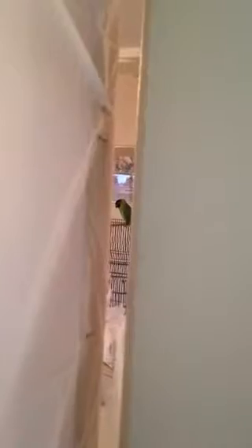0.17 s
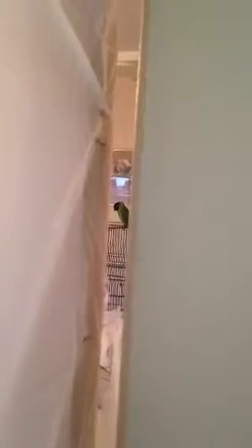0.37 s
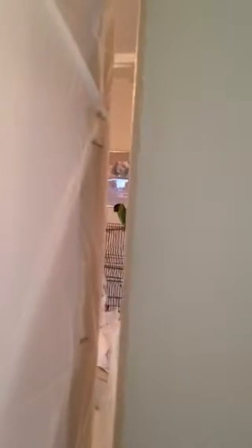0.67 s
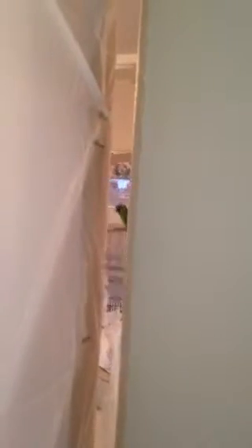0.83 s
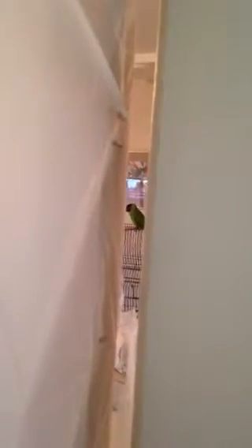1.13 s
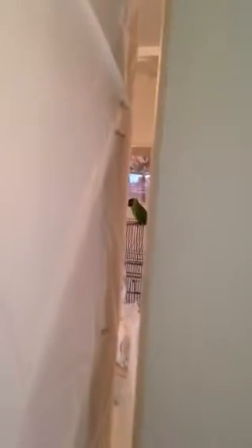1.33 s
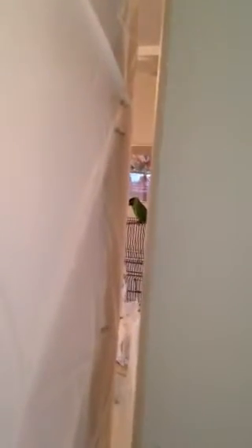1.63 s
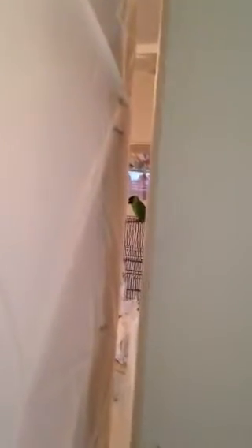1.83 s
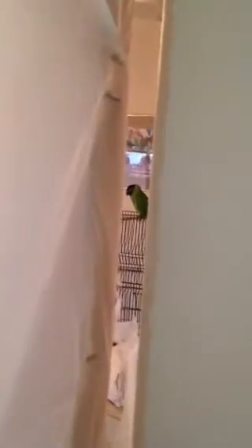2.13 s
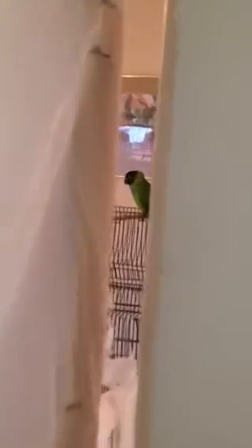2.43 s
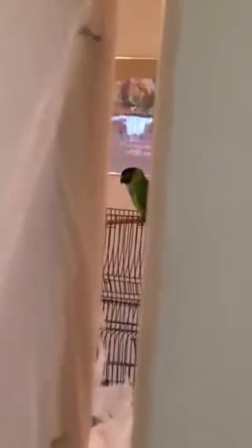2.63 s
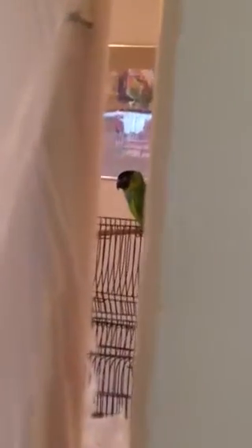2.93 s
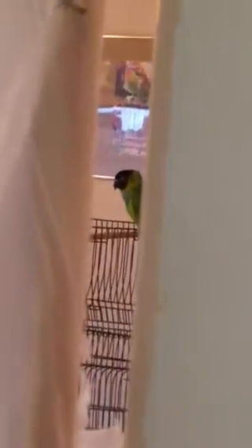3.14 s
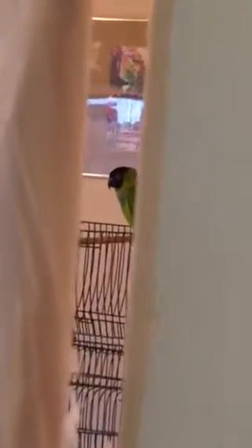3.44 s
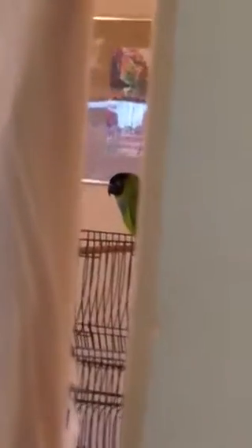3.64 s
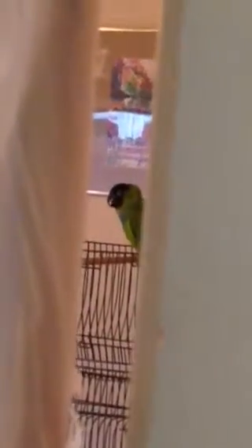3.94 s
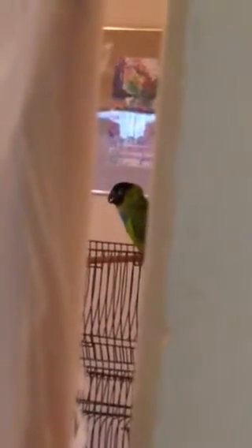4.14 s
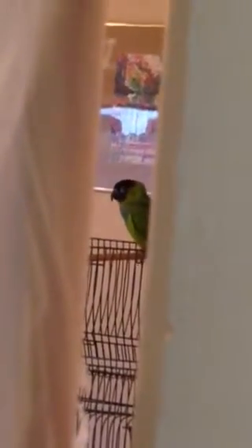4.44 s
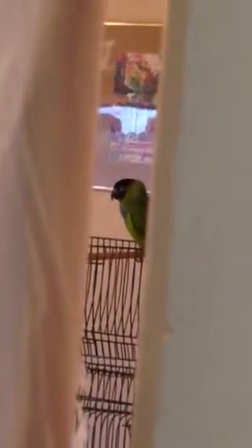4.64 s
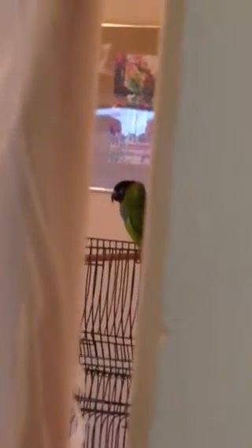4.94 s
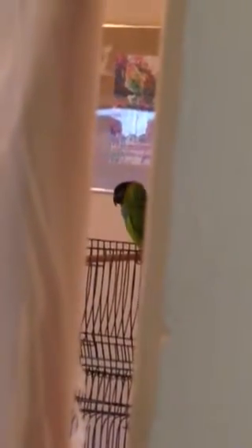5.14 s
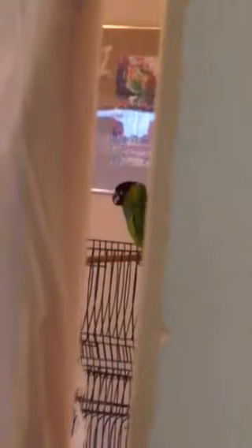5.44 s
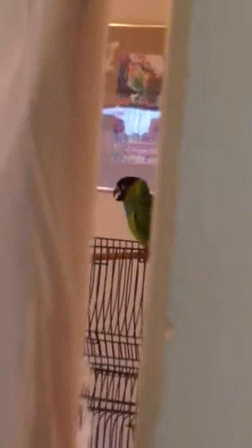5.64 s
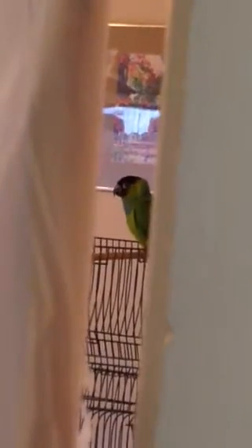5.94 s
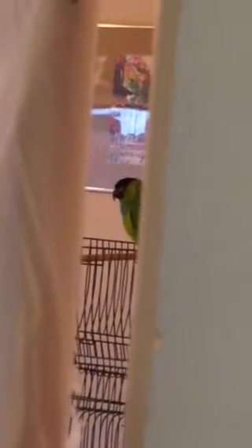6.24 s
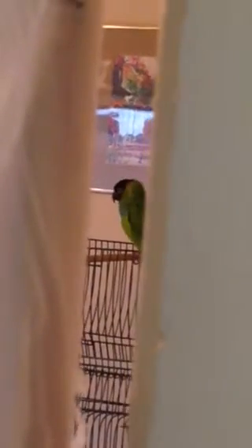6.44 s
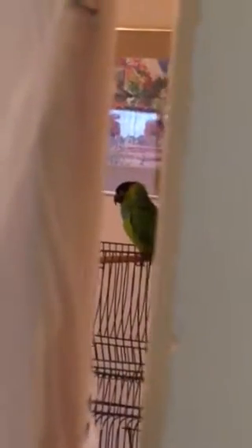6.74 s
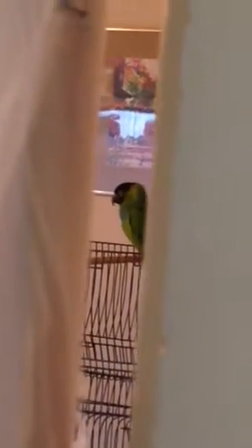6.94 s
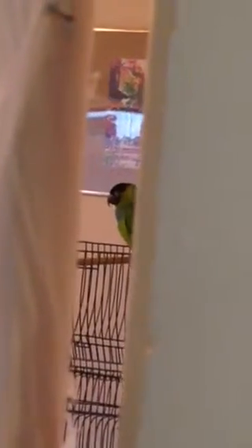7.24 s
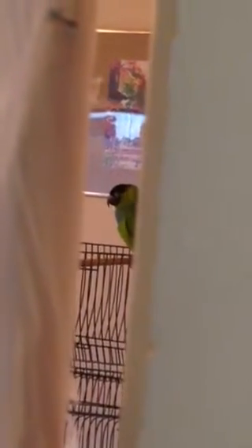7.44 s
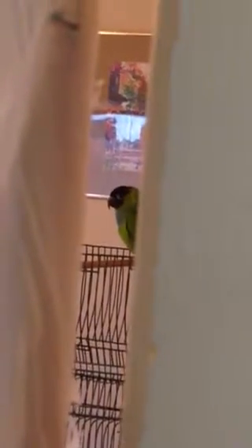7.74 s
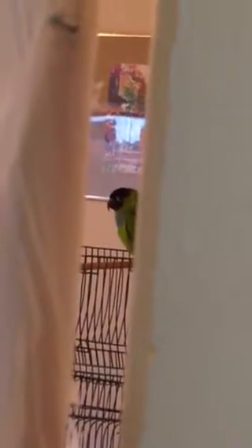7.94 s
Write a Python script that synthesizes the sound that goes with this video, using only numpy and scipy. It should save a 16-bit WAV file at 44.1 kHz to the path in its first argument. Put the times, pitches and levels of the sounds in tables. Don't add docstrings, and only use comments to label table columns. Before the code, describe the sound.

Over quiet hum and rumble, a caged conure gives soft clucks, clear whistles, a rasping screech, four rapid loud squawks, and faint claw taps.

```python
import sys
import numpy as np
from scipy import signal
from scipy.fft import rfft, irfft
from scipy.io import wavfile
from scipy.ndimage import uniform_filter1d, minimum_filter1d

SR = 44100
rng = np.random.default_rng(int(sys.argv[2]) if len(sys.argv) > 2 else 0)


def convert_level_to_amplitude(level_db):
    exponent = np.asarray(level_db, float) / 20
    return 10 ** exponent


def inscribe(sig):
    pcm = np.round(np.clip(np.atleast_2d(sig).T, -1, 1) * 32767)
    wavfile.write(sys.argv[1], SR, pcm.astype(np.int16))


N = 356857


def shape(points, hz):
    f, v = np.transpose(points)
    return np.interp(np.log(np.maximum(hz, 1)), np.log(f), v)


def noise(colour, size=N):
    gain = convert_level_to_amplitude(shape(colour, np.fft.rfftfreq(size, 1 / SR)))
    x = irfft(rfft(rng.standard_normal(size)) * gain, size)
    return x / x.std()


def walk(rate, size):
    k = max(int(SR / rate), 1)
    steps = np.repeat(rng.standard_normal(size // k + 1), k)
    return 1.6 * uniform_filter1d(uniform_filter1d(steps, k), k)[:size]


def strokes(rows):
    t = np.arange(N) / SR
    gain = 0
    for s, db, length in rows:
        distance = np.maximum((t - s) / length, (s - t) / (0.75 * length))
        gain = gain + convert_level_to_amplitude(db - 18 * distance)
    return gain


def play(tables, sing, edge_s=0.00077):
    out = np.zeros(N)
    for rows in tables:
        s, *columns = np.transpose(rows)
        n = np.arange(int(s[0] * SR), min(int(s[-1] * SR), N))
        t = n / SR
        ends = np.clip(np.minimum(t - s[0], s[-1] - t) / edge_s, 0, 1)
        out[n] += ends * sing(*(np.interp(t, s, c) for c in columns))
    return out


def stack(hz, gains_db):
    k = np.arange(1, len(gains_db) + 1)[:, None]
    phase = 2 * np.pi * np.cumsum(hz) / SR
    audible = k * hz < .4 * SR
    return np.sqrt(2) * np.sum(convert_level_to_amplitude(gains_db) * audible * np.sin(k * (phase + k)), axis=0)


def syrinx(hz, level_db, throat, weak_db, flicker_db, breath_db, count=24):
    k = np.arange(1, count + 1)[:, None]
    flicker = np.array([walk(90, len(hz)) for _ in k])
    gains_db = shape(throat, k * hz) + weak_db * (k % 2) + flicker_db * flicker
    gains_db = gains_db - 10 * np.log10(np.mean(np.sum(convert_level_to_amplitude(2 * gains_db), axis=0)))
    breath = convert_level_to_amplitude(breath_db) * noise(throat, len(hz))
    return convert_level_to_amplitude(level_db) * (stack(hz, gains_db) + breath)


# frequency in Hz, level in dB.
SQUAWK_THROAT = [(600, -50.5), (1000, -26), (2050, -14), (3050, -9.5), (3500, -3.5), (4150, -1.5),
                 (5100, -15), (6110, -9), (7200, -12.5), (8500, -18.5), (10500, -16), (12000, -28),
                 (14200, -25), (15500, -45)]


def squawk(level_db):
    share = np.linspace(0, 1, len(level_db))

    def bumps(lag, width=.06):
        return sum(np.exp(-((share - at - lag) / width) ** 4) for at in (.42, .63))

    fresh = np.exp(-share / .1)
    fall = np.clip((share - .76) / (1 - .76), 0, 1) ** 2
    hz = 980 + 25.5 * (1 - fresh) + 42 * bumps(0) - 133 * fall
    weak_db = -0.5 - 19 * (bumps(.05) + fresh + .7 * fall)
    catch_db = 6.5 * bumps(0) - 6 * bumps(1.4 * .06, .023)
    pitch = hz * (1 + (.005 + .015 * fall) * walk(400, len(hz)))
    return syrinx(pitch, level_db + catch_db - 2, SQUAWK_THROAT, weak_db, 2.5, -18, count=15)


# frequency in Hz, level in dB.
RUNUP_THROAT = [(290, -74), (500, -27.5), (1220, -19), (2200, -34.5), (2930, 2.5), (3330, -5), (3680, -5.5),
                (7130, -19.5), (8120, -20.5), (9650, -20.5), (15500, -52.5)]


def runup(hz, level_db):
    rough = syrinx(hz * (1 + .12 * walk(900, len(hz))), level_db, RUNUP_THROAT, 0, 4, 0)
    return rough + stack(hz, [level_db - 12])


# run-up start in s, membranes lock in s, call end in s, run-up level in dB, call level in dB.
SQUAWKS = [
    (5.098, 5.128, 5.228, -14.5, -7),
    (5.313, 5.338, 5.439, -16, -7.5),
    (5.532, 5.558, 5.66, -16.5, -7.5),
    (5.765, 5.793, 5.893, -17.5, -6.5),
]
# loudest in s, level in dB, length in s.
GASP = [
    (5.887, -14.5, .015),
]


def squawks():
    from_hz, to_hz, swell_s, release_s = 620, 1868, .008, 0.0085
    ups, calls = [], []
    for s, lock, end, up_db, call_db in SQUAWKS:
        swelled_hz = from_hz + (to_hz - from_hz) * swell_s / (lock - s)
        ups.append([(s, from_hz, up_db - 18), (s + swell_s, swelled_hz, up_db),
                    (lock + .001, to_hz, up_db - 5.5)])
        calls.append([(lock, call_db), (end - release_s, call_db), (end, call_db - 13)])
    return play(ups, runup) + play(calls, squawk) + noise(SQUAWK_THROAT) * strokes(GASP)


# frequency in Hz, level in dB.
SCREECH_THROAT = [(600, -68.5), (1100, -29.5), (1500, -17.5), (2250, -6.5), (3300, -9.5), (4400, -1.5),
                  (5500, -14), (6300, -10.5), (8000, -20), (10500, -34), (13000, -41), (15500, -43.5)]


def rasping_voice(hz, level_db):
    shake_hz = 135 * np.exp(.35 * walk(150, len(hz)))
    shake = np.sin(2 * np.pi * np.cumsum(shake_hz) / SR)
    pitch = hz * (1 + .04 * np.tanh(3 * shake) + .013 * walk(300, len(hz)))
    shaken = convert_level_to_amplitude(3.5 * shake + 1.5 * walk(200, len(hz)))
    return shaken * syrinx(pitch, level_db, SCREECH_THROAT, 0, 3, -18, count=14)


# time in s, pulse rate in Hz, level in dB.
SCREECH = [
    [(4.024, 520, -56.5), (4.034, 793, -26.5), (4.045, 1037, -23), (4.062, 1060, -13.5), (4.11, 1103, -14),
     (4.15, 1105, -15), (4.183, 1095, -14), (4.192, 1018, -10), (4.205, 900, -28)],
]


def screech():
    return play(SCREECH, rasping_voice)


def whistle(hz, level_db, beak_db, edge_db):
    third_db = level_db - 12 + edge_db + 0.52 * beak_db + 3 * walk(56, len(hz))
    upper = [third_db + step_db for step_db in (-11, -14, -11)]
    pitch = hz * (1 + 0.0034 * walk(200, len(hz)))
    return stack(pitch, np.array([level_db, level_db + beak_db, third_db] + upper))


# time in s, pitch in Hz, level in dB, beak opening as lift of the second partial in dB.
WHISTLES = [
    [(1.647, 2505, -34, 15), (1.673, 2515, -31, 7.5), (1.693, 2470, -24.5, -3.5), (1.725, 2365, -20.5, -12),
     (1.742, 2313, -34, -12), (1.752, 2227, -30, -29.5), (1.76, 2270, -36.5, -25.5)],
    [(4.914, 2580, -17.5, -6.5), (4.93, 2680, -18, -4), (4.966, 2495, -21.5, -10),
     (5.008, 2455, -27.5, -8.5), (5.018, 2300, -24.5, -13), (5.028, 1946, -26.5, -19.5)],
    [(6.124, 2380, -40.5, 6), (6.145, 2480, -28.5, -6), (6.165, 2480, -25, -11.5), (6.193, 2475, -31.5, 0),
     (6.215, 2440, -30, -15)],
]
WHISTLE_EDGE_DB = (-4.5, 4, 3.5)
# loudest in s, level in dB, length in s.
RASP = [
    (4.972, -35, 0.038),
]


def whistles():
    rows = [[tuple(row) + (edge_db,) for row in table] for table, edge_db in zip(WHISTLES, WHISTLE_EDGE_DB)]
    hiss = noise([(2500, -30), (3800, 1.5), (8000, -5), (11000, -10.5), (15000, -25)]) * strokes(RASP)
    return play(rows, whistle, edge_s=1 / 200) + hiss


# frequency in Hz, level in dB.
CLUCK_THROAT = [(300, -42.5), (600, -7.5), (900, -3), (1500, -10.5), (2600, -19.5), (4500, -26.5),
                (6000, -29), (8000, -48.5), (12000, -80)]


def croak(hz, level_db, odd_db, rough):
    pitch = hz * (1 + .08 * rough ** 2 * walk(600, len(hz)))
    return syrinx(pitch, level_db, CLUCK_THROAT, odd_db, 3, 14 * rough - 17, count=10)


# start in s, length in s, starting pitch in Hz, level in dB, roughness 0-1.
CLUCKS = [
    (1.424, 0.02, 629, -31.5, 0.89),
    (1.614, 0.036, 684, -33.5, 0.87),
    (4.021, 0.024, 1024, -41, 0),
    (4.872, 0.039, 563.4, -23.5, 0.36),
]


def clucks():
    rows = []
    for s, length, hz, db, rough in CLUCKS:
        peak = .8 - .6 * rough
        rows.append([(s + share * length,
                      hz * 2 ** (30 * share * length),
                      db - 650 * length * abs(share - peak),
                      rough) for share in (0, peak, 1)])

    def sing(hz, db, rough):
        odd_db = 12 * (1 - rough) * np.log2(hz / 900) - 8 * rough
        return croak(hz, db, odd_db, rough)

    return play(rows, sing, edge_s=1 / 250)


# time in s, pitch in Hz, level in dB, odd partials in dB, roughness 0-1.
SIGH = [
    [(4.185, 1550, -50, 0, 0.5), (4.2, 1448, -44.5, 4.5, 0.45), (4.23, 1184, -49, -6, 0.6)],
]


def sigh():
    return play(SIGH, croak, edge_s=1 / 250)


def taps(rows):
    out, t = np.zeros(N + SR), np.arange(SR // 5) / SR
    for s, peak_db, hz, octaves, t60 in rows:
        skirt, half = 4 ** octaves, 2 ** (octaves / 2)
        burst = noise([(hz / skirt, -40), (hz / half, 0), (hz * half, 0), (hz * skirt, -40)], len(t))
        decay = convert_level_to_amplitude(-60 * t / max(t60, .004))
        attack = np.minimum(t * hz * 2, 1)
        start = int(s * SR)
        out[start:start + len(t)] += convert_level_to_amplitude(peak_db - 1.0) * burst * decay * attack
    return out[:N]


# time in s, peak in dB, centre in Hz, width in octaves, t60 in s.
TAPS = [(1.862, -34.5, 460, 1.8, 0.081), (1.875, -38.5, 197, 1.5, 0.13), (2.083, -47, 2400, 2.4, 0.047),
        (2.64, -57.5, 1500, 1.6, 0.044), (3.66, -58, 690, .8, 0.142), (7.146, -47.5, 1090, 1.9, 0.1),
        (7.317, -55, 1600, 1.5, .02), (7.413, -44.5, 2600, 1.8, 0.016), (7.433, -38.5, 890, 2.65, 0.048),
        (7.74, -60.5, 900, 1.8, 0.12)]


def far_taps():
    return taps(TAPS)


# time in s, peak in dB, centre in Hz, width in octaves, t60 in s.
NEAR_TAPS = [
    (1.066, -29, 225, 1.5, 0.016),
    (2.478, -49.5, 307, 0.32, 0.041),
    (2.548, -50, 334, 2.5, 0.0157),
]


def near_taps():
    return taps(NEAR_TAPS)


# frequency in Hz, t60 in s.
ROOM_T60 = [(300, 0.39), (1000, 0.4), (3000, 0.52), (6000, 0.47), (12000, 0.22)]


def room(x):
    gap_s, level_db = 0.0056, -11
    t = np.arange(SR) / SR
    tail = 0
    for hz in 125 * 2. ** np.arange(8):
        band = noise([(hz / 2, -40), (hz / 1.3, 0), (hz * 1.3, 0), (hz * 2, -40)], SR)
        tail = tail + np.sqrt(hz) * band * convert_level_to_amplitude(-60 * t / shape(ROOM_T60, hz))
    tail = tail * np.clip(t / gap_s - 1, 0, 1)
    return signal.fftconvolve(x, tail * convert_level_to_amplitude(level_db) / np.sqrt(np.sum(tail ** 2)))[:N]


# frequency in Hz, level in dB.
SIDEWAYS = [(2600, -0.5), (3500, -0.5), (4100, -5), (4800, 1.5), (6000, 2.5), (9000, -3)]


def toward_walls(x):
    return irfft(rfft(x) * convert_level_to_amplitude(shape(SIDEWAYS, np.fft.rfftfreq(N, 1 / SR))), N)


# loudest in s, level in dB, length in s.
CLOTH = [(0.01, -67.5, 0.038), (.19, -44, 0.13), (.56, -65.5, 0.33), (1.02, -67.5, 0.13),
         (1.29, -73, 0.087), (2.06, -61, 0.094), (2.2, -63, 0.068), (2.303, -63.5, 0.023),
         (2.44, -69, 0.19), (2.515, -70, 0.0225), (2.68, -67.5, 0.212), (2.87, -73.5, 0.064),
         (3.07, -71, 0.102), (3.31, -74.5, 0.11), (3.64, -80, 0.095), (3.87, -71, 0.059), (7.5, -75.5, .1),
         (7.74, -74, .15)]
# frequency in Hz, level in dB per Hz.
CLOTH_COLOUR = [(470, -38), (800, -16.5), (1330, -21), (2320, -2), (2940, -7), (3330, -1.5), (5200, 0),
                (11700, -7.5), (15500, -21.5)]


def cloth():
    grain = convert_level_to_amplitude(0.96 * walk(220, N))
    return grain * noise(CLOTH_COLOUR) * strokes(CLOTH)


# loudest in s, level in dB, length in s.
SHUFFLE = [(.015, -74, 0.027), (.13, -62.5, 0.27), (.5, -73.5, 0.136), (1.04, -64, 0.18), (1.22, -67, 0.19),
           (1.93, -60, .2), (2.45, -65.5, 0.24), (2.71, -56, 0.077), (3.31, -71.5, 0.24),
           (3.64, -64, 0.139), (4.55, -69, .2), (6.87, -71.5, .05), (7.04, -75, 0.092),
           (7.56, -75.5, 0.075), (7.76, -65, 0.32)]


def shuffling():
    colour = [(120, -7.0), (350, -2.0), (900, -6), (2000, -14.5), (5000, -33)]
    return convert_level_to_amplitude(3.8 * walk(40, N) + 1.0) * noise(colour) * strokes(SHUFFLE)


# frequency in Hz, level in dB.
HUM = [(120.1, -49), (240.2, -81)]
# frequency in Hz, level in dB per Hz.
FLOOR = [(15, -26.5), (25, -14.5), (50, -3), (80, 1), (160, -4), (300, -8.5), (700, -15), (2200, -24),
         (6000, -31.5), (10800, -36), (14700, -48), (16000, -55)]


def house():
    t = np.arange(N) / SR
    hum = 0
    for hz, db in HUM:
        hum = hum + convert_level_to_amplitude(db + .5 * walk(12, N)) * np.sqrt(2) * np.sin(2 * np.pi * hz * t)
    return hum + convert_level_to_amplitude(-61.5 + 0.4 * walk(5.7, N)) * noise(FLOOR)


def scene():
    loud, harsh = squawks(), screech()
    calls = whistles() + sigh() + clucks()
    near, far = near_taps(), far_taps()
    wet = room(calls + toward_walls(loud) + harsh + .3 * near + 0.98 * far)
    direct = calls + loud + convert_level_to_amplitude(-6.5) * harsh + near + far
    return (direct + wet + cloth() + shuffling() + house())[None]


def over_db(x, top_db, hold_s, slew_s):
    hold, slew = int(hold_s * SR), int(slew_s * SR)
    peak = -minimum_filter1d(-np.abs(x), hold, origin=(hold - 1) // 2)
    over = np.maximum(20 * np.log10(peak + 1e-9) - top_db, 0)
    return uniform_filter1d(over, slew, origin=-(slew // 2))


def band_limit(x):
    return signal.sosfilt(signal.butter(12, 16470, fs=SR, output="sos"), x)


def record(dry):
    bass = signal.sosfiltfilt(signal.butter(2, 550, fs=SR, output="sos"), dry)
    duck_db = np.minimum(1.6 * np.abs(over_db(dry, -7.5, 0.297, .01)) ** 1.6, 16)
    duck_db = uniform_filter1d(duck_db, SR // 14, origin=SR // 60)
    squeeze_db = over_db(dry, -1.5, .004, .003)
    x = (dry - bass * (1 - convert_level_to_amplitude(-duck_db))) * convert_level_to_amplitude(-squeeze_db)
    near_top = np.tanh(over_db(dry, -5.0, 0.0066, .008) / 1.9)
    strain = uniform_filter1d(near_top, SR // 10, origin=SR // 21) ** 2 * near_top
    rumble = noise([(35, -41.5), (70, -4), (300, -6), (700, -1.5), (1600, -8), (4000, -43)])
    x = x + convert_level_to_amplitude(-33.5) * strain * convert_level_to_amplitude(1.2 * walk(120, N)) * rumble
    clipped = .95 * np.tanh(x / .95)
    mix = signal.sosfiltfilt(signal.ellip(8, .2, 40, 15700, fs=SR, output="sos"), clipped)
    return band_limit(mix)


dry = scene()
out = record(dry)
inscribe(out)
```